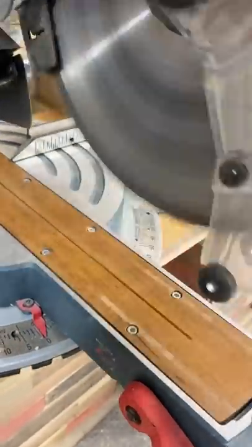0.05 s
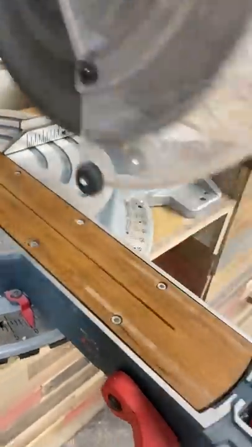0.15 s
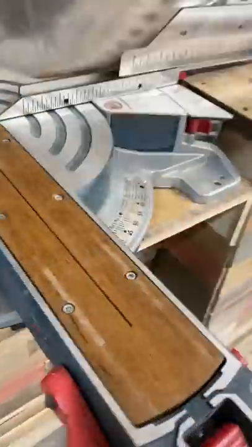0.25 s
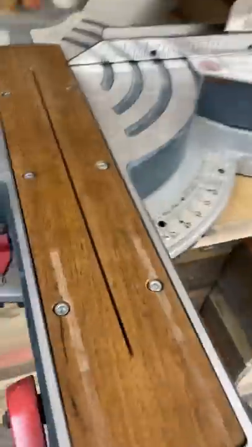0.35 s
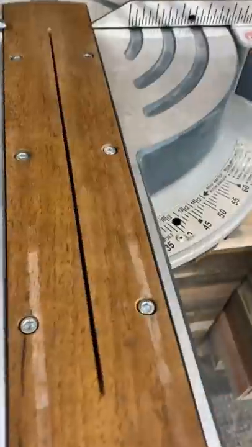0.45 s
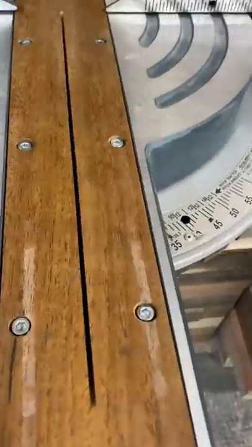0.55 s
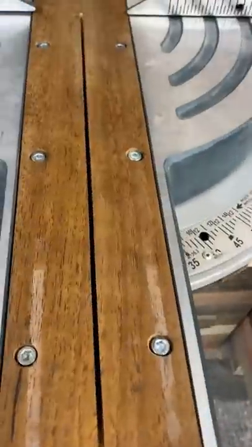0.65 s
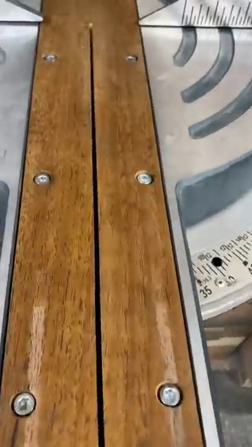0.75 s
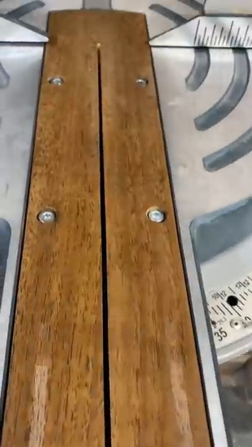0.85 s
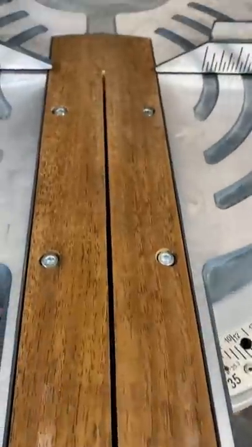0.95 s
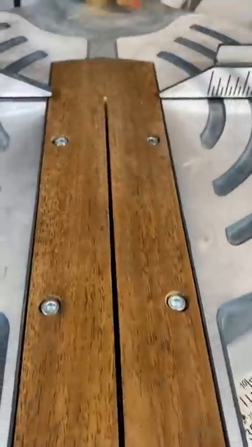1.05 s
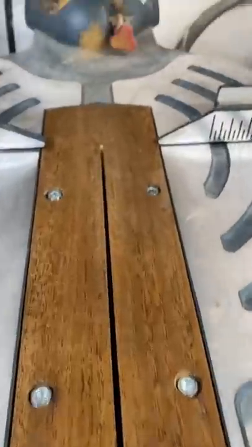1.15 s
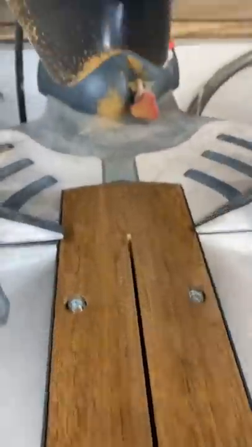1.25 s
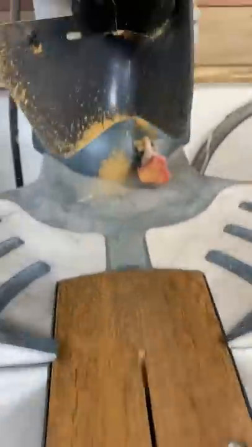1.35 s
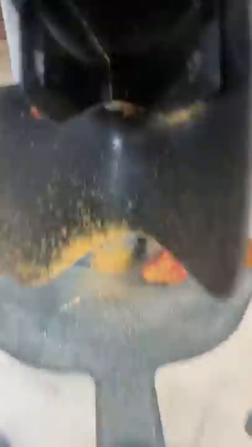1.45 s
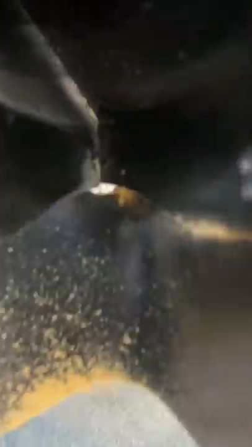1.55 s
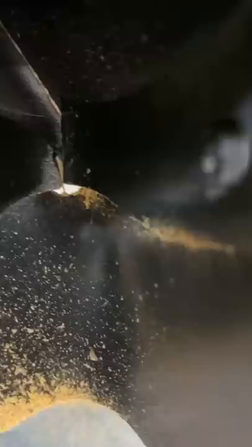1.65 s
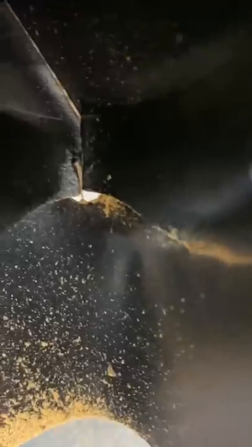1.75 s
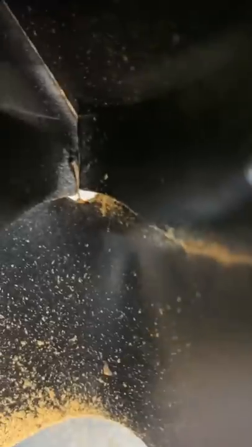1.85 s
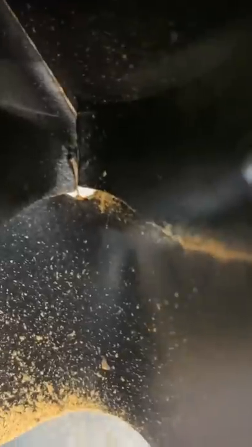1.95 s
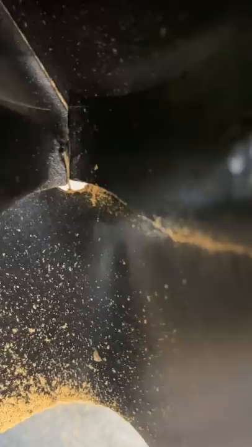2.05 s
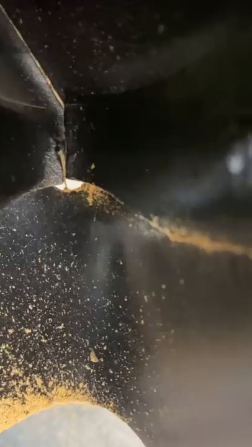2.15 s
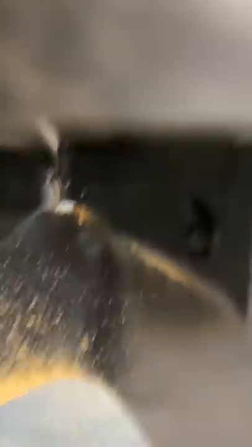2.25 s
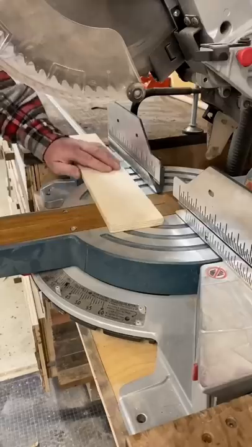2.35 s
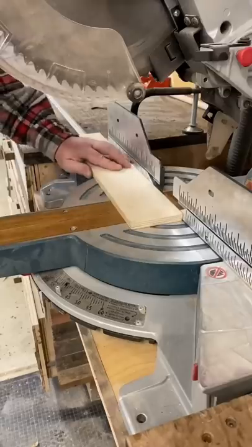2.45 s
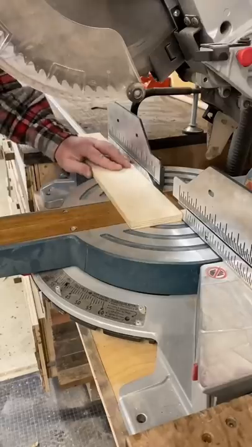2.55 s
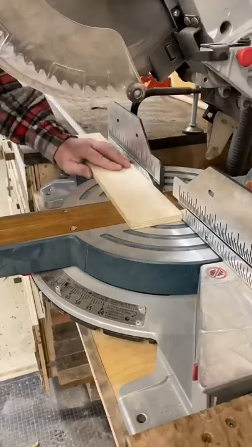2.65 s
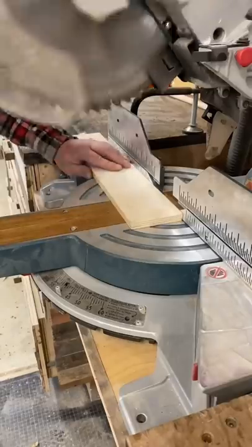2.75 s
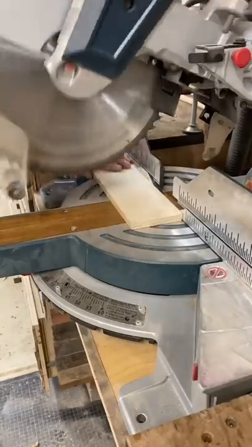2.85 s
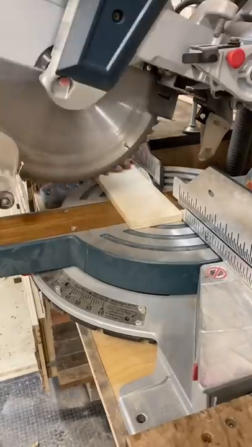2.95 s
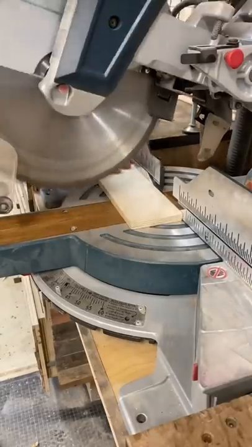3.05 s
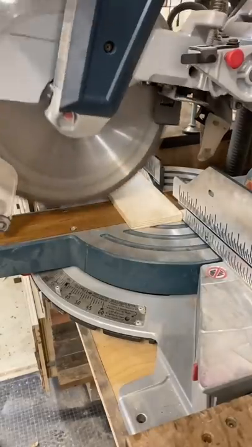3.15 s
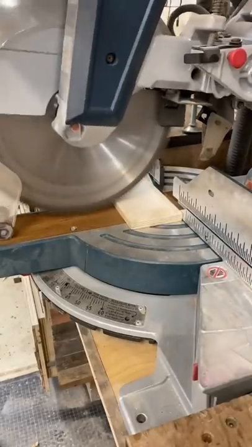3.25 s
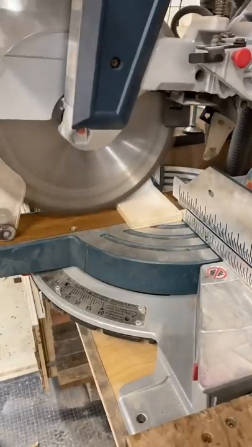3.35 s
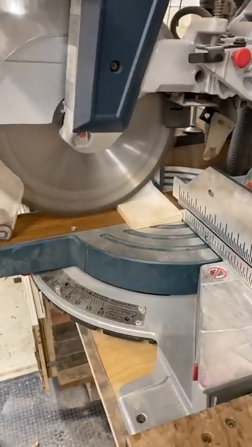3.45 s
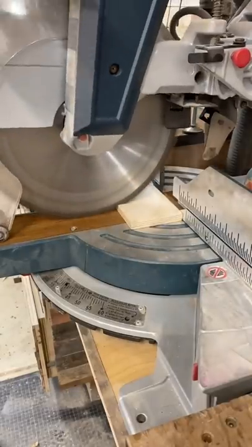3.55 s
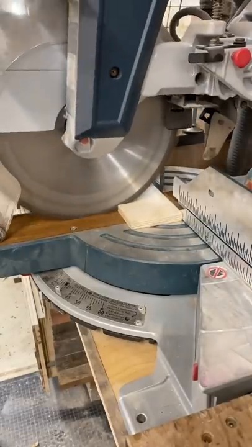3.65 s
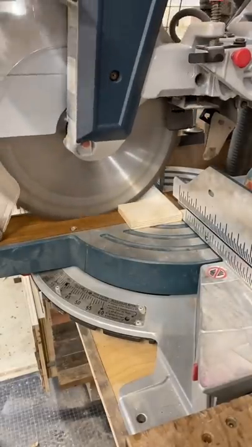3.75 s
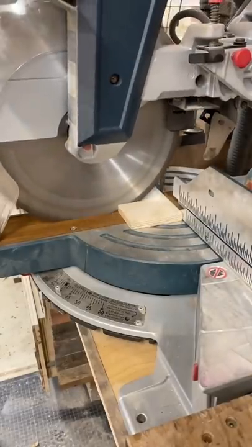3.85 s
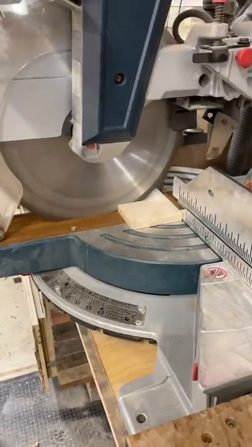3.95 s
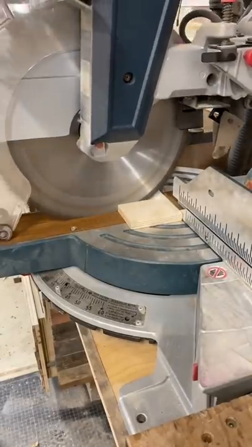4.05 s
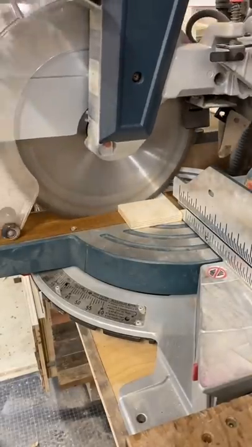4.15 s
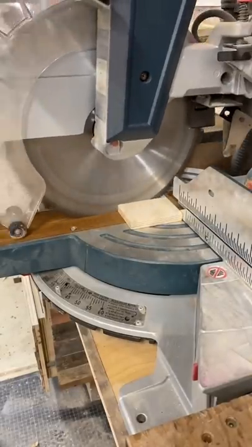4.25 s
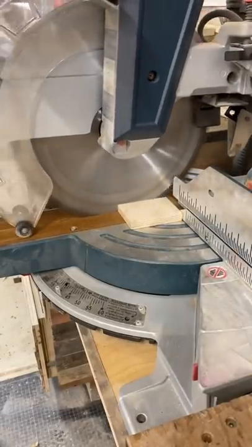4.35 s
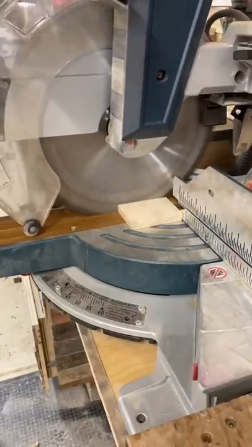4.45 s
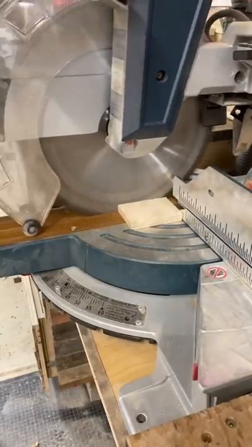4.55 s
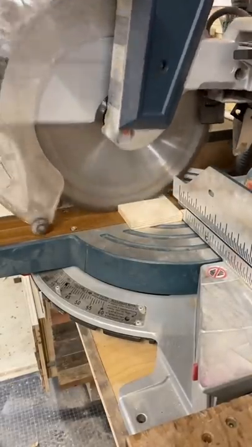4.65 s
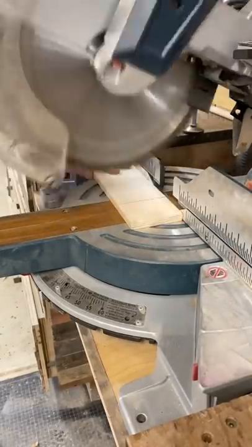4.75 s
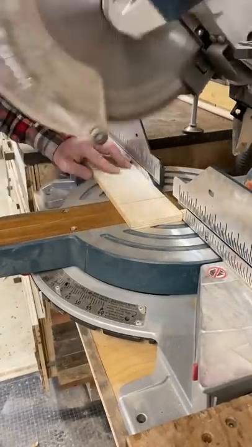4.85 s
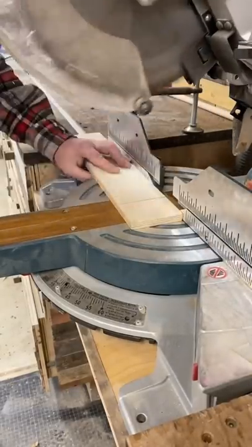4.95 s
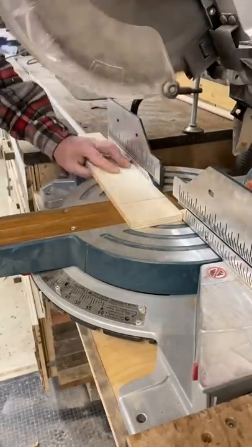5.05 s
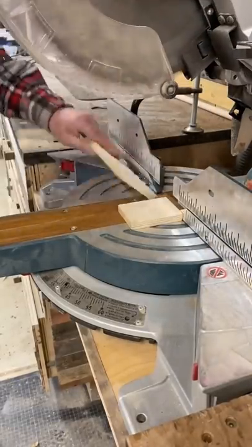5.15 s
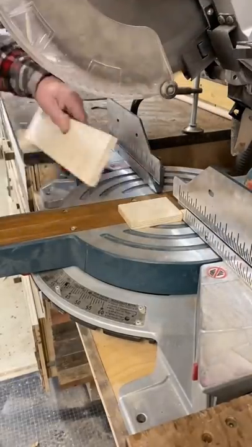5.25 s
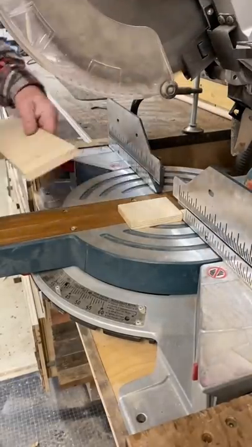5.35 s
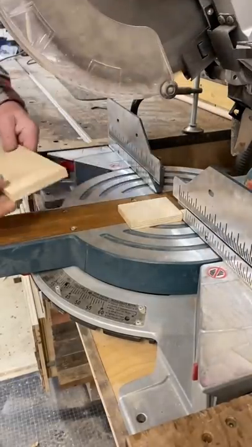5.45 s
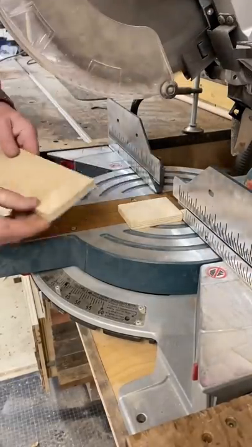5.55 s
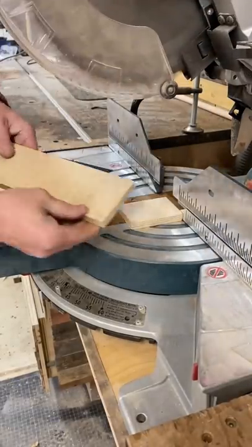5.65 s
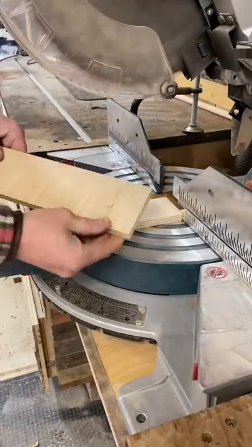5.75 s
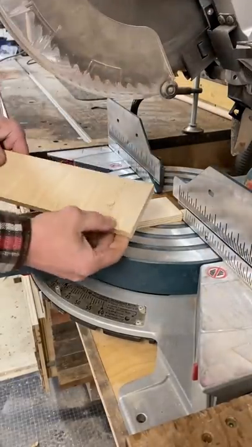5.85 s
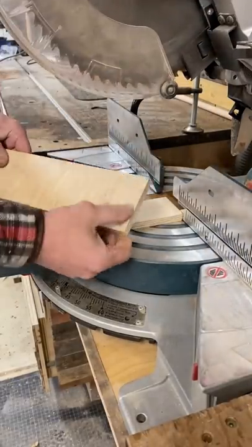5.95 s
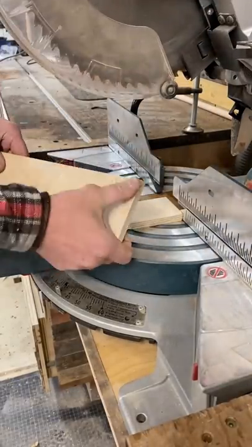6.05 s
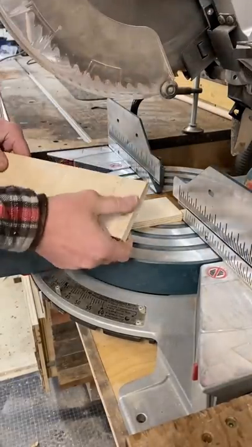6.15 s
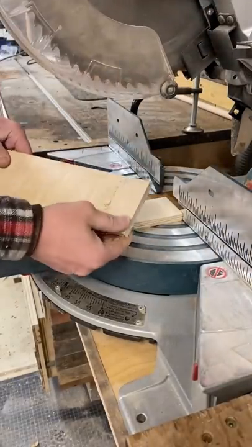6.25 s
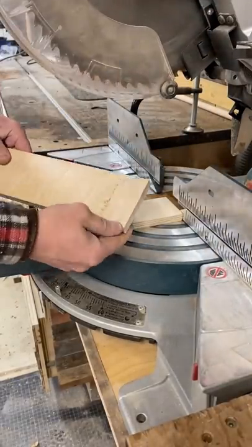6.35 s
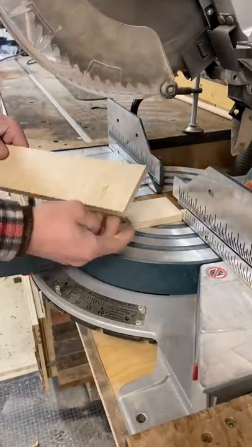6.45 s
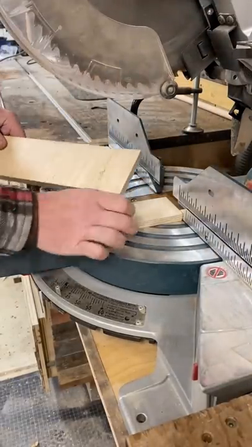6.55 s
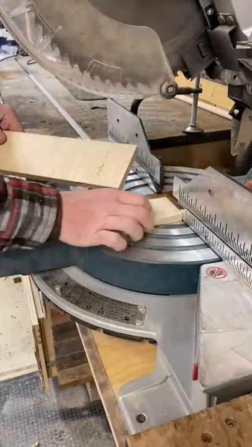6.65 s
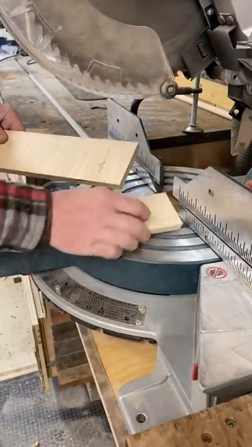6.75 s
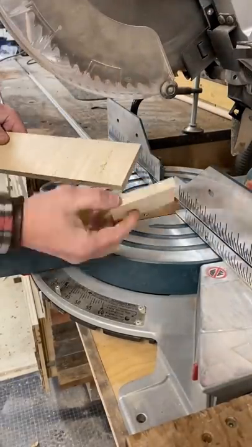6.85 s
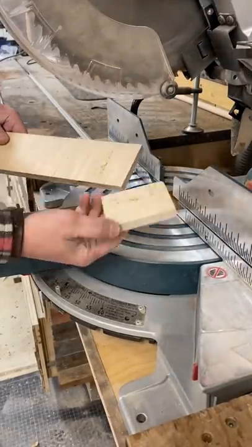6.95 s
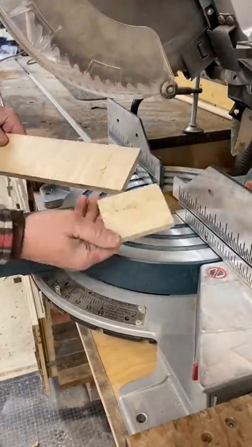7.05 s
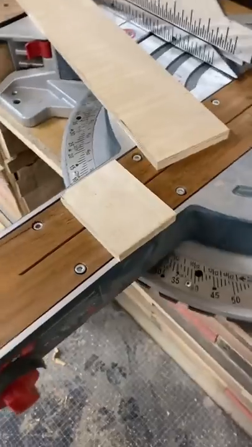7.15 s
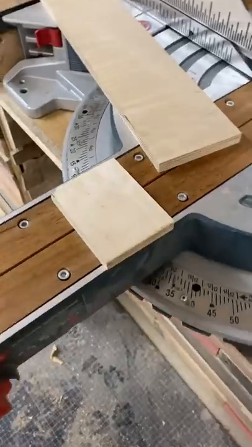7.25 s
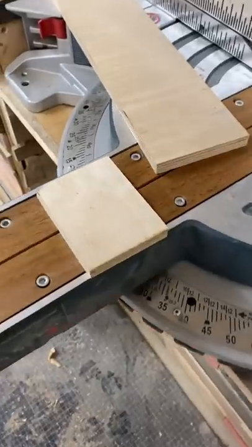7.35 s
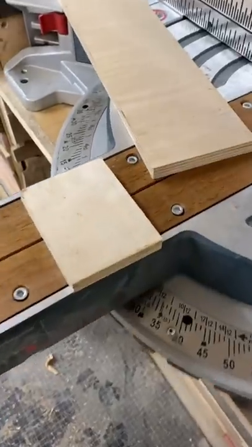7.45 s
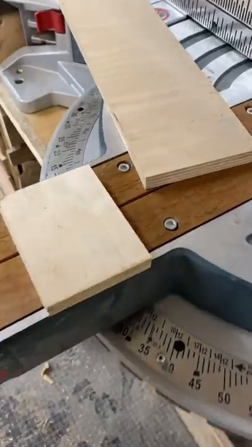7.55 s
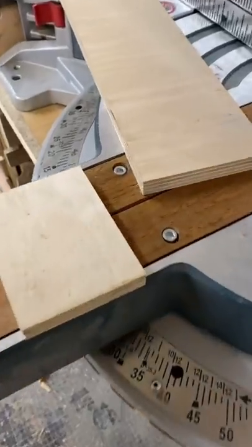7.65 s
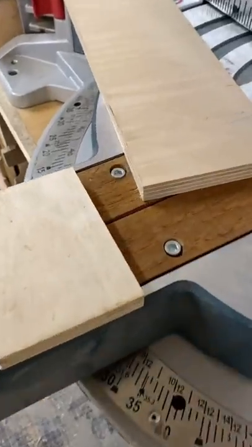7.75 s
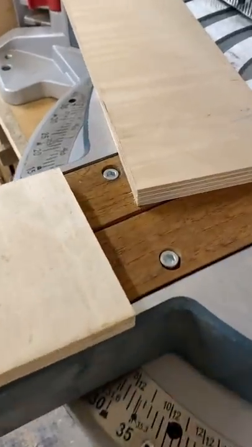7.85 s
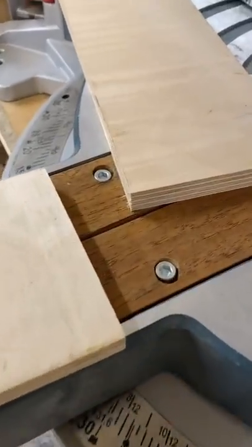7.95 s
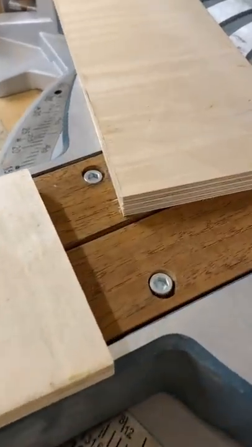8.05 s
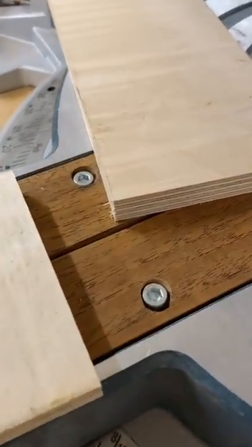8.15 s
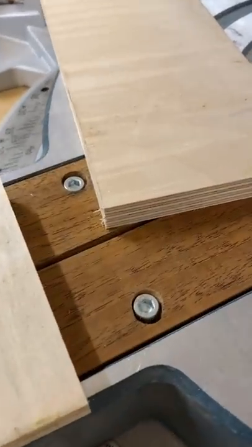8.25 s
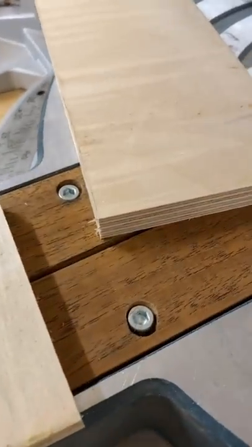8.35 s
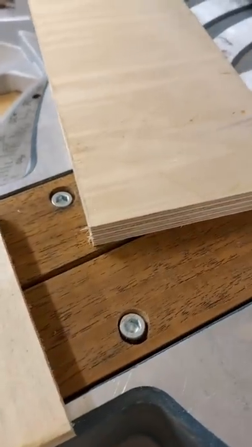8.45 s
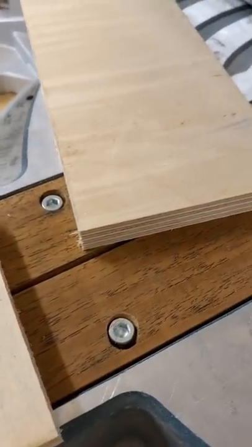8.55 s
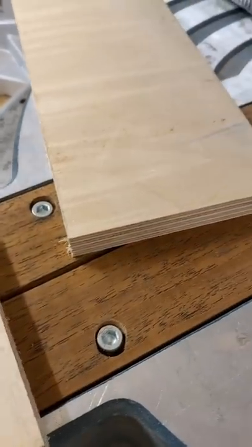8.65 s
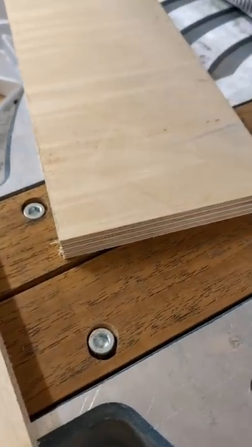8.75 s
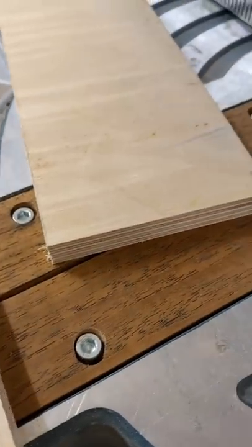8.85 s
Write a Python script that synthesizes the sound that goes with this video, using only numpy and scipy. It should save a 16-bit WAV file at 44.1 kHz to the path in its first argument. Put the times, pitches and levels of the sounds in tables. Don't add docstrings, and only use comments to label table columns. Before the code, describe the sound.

Close to a dust extractor, the last of a braking blade gives way to a tonal fan hum and airy hiss that glide down in pitch. Abruptly, beside a miter saw: a very loud latch snap, rattling knocks, a fierce motor run-up, bright ringing blade whoosh, a short rasp and falling brake whine over an extractor's roar. Then a sudden cut to a nearly silent workshop.

```python
import sys
import numpy as np
from scipy import signal
from scipy.fft import rfft, irfft, next_fast_len
from scipy.io import wavfile
from scipy.ndimage import uniform_filter1d

SR = 44100
rng = np.random.default_rng(int(sys.argv[2]) if len(sys.argv) > 2 else 0)


def store_pcm(level_fs):
    pcm = np.round(np.clip(level_fs, -1, 1) * 32767).astype(np.int16)
    wavfile.write(sys.argv[1], SR, np.atleast_2d(pcm).T)


def makeup_ratio(level_db):
    decades = np.asarray(level_db, float) / 20
    return 10 ** decades


N = 392931
T = np.arange(N) / SR
EDGE_HZ = 15880

# start t/s, end t/s
SHOTS = [
    (0, 2.223),
    (2.234, 6.979),
    (6.985, 9),
]


def evened(x):
    return x / np.sqrt(np.mean(x ** 2) + 1e-20)


def filtered(x, order, hz, kind):
    return signal.sosfilt(signal.butter(order, hz, kind, fs=SR, output="sos"), x)


def read(points, hz):
    f, value = np.transpose(points)
    return np.interp(np.log(hz + 1), np.log(f + 1), value)


def columns(rows):
    s, *values = np.transpose(rows)
    gate = uniform_filter1d(((T >= s[0]) & (T < s[-1])) * 1., size=90)
    return gate, [np.interp(T, s, v) for v in values]


def during(start, end):
    return np.append(np.arange(start, end, 1 / 200), end)


def drift(per_s, t=T):
    steps = rng.standard_normal(int(N / SR * 400) + 2)
    r = np.exp(-2 * np.pi * per_s / 400)
    wander = evened(signal.lfilter([1], [1, -r], steps))
    return np.interp(t * 400, np.arange(len(steps)), wander)


def strokes(rows, rise_db_per_s, fall_db_per_s, t=T):
    u = T[::40]
    gain = 0
    for s, hold, db in rows:
        before, after = np.maximum(s - u, 0), np.maximum(u - s - hold, 0)
        gain = gain + makeup_ratio(db - rise_db_per_s * before - fall_db_per_s * after)
    return np.interp(t, u, gain)


def lift_db(peaks, hz):
    return sum(db / (1 + (2 * (hz - f) / width) ** 2) for f, width, db in peaks)


# f/Hz, level/dB
LEAN = [
    [(300, 4.5), (1600, -4), (15000, 0)],
    [(300, 5), (1400, -2.5), (3100, -0.5), (5600, -4), (8000, -1.5), (9600, -9), (10400, 0.5), (15000, 0)],
    [(300, 2.5), (15000, -1)],
]
# f/Hz, phase/rad
LEAD = [
    [(0, 0), (1000, -.7), (2410, -1.5), (3960, -3.3), (7490, -6.4), (8960, -6), (11900, -3.3),
     (16500, -5.5)],
    [(0, 0), (500, -.2), (1290, -.4), (2200, -.1), (3800, 0), (5600, .95), (8300, .7), (9000, 1.6),
     (9650, 3.4), (10300, 5.9), (11000, 6.55), (12400, 7), (16500, 7.8)],
    [(0, 0), (300, .2), (1400, 2.9), (3400, 2), (8000, 2.3), (9990, 3.3), (11500, 6.9), (15000, 7.3)],
]


def ports(hz, shot):
    apart = np.clip(hz / 1100, 0, 1) ** 2
    lead = np.interp(hz, *np.transpose(LEAD[shot]))
    return makeup_ratio(apart * read(LEAN[shot], hz) / 2) * np.exp(.5j * apart * lead)


# f/Hz, likeness (0-1)
LIKENESS = [
    [(300, 1), (1500, 1), (15000, 0.051)],
    [(300, 1), (1400, .88), (2000, .8), (3200, 1), (4800, .82), (7500, .68), (9000, .65), (10300, .8),
     (11000, .95), (15000, .82)],
    [(150, 0.92), (600, 0.32), (15000, 0.7)],
]


def air(spectrum, shot, peaks=(), patchy_db=0.5, comb_db=3.0):
    hz = np.fft.rfftfreq(1024, 1 / SR)
    a, b, c, d, patches = rng.standard_normal((N // 256 + 5, 513, 5), dtype=np.float32).T
    patches = evened(uniform_filter1d(uniform_filter1d(patches, size=8, axis=0), size=10, axis=1))
    same = np.clip(np.where(hz < 350, 1, read(LIKENESS[shot], hz)), -1, 1)[:, None]
    lean = ports(hz, shot)[:, None]
    left = a + 1j * b
    right = same * left + np.sqrt(1 - same ** 2) * (c + 1j * d)
    z = np.array([left * lean, right / lean])
    x = signal.istft(z * makeup_ratio(patchy_db * patches), nperseg=1024, noverlap=768)[1]
    size = next_fast_len(N)
    fine = np.fft.rfftfreq(size, 1 / SR)
    comb = np.interp(fine, np.arange(900) * 25, rng.standard_normal(900))
    colour_db = read(spectrum, fine) + lift_db(peaks, fine) + comb_db * comb * np.clip(fine / 1200, .2, 1)
    return evened(irfft(rfft(x[:, :size], size) * makeup_ratio(colour_db), size)[:, :N])


def whine(rows, orders, body=(), waver_db=2.5, jitter=0.00084, ring=0.88):
    gate, (hz, level_db) = columns(rows)
    live = gate > 0
    hz, out = hz[live], np.zeros(N)
    turns = np.cumsum(hz * (1 + jitter * drift(25, T[live]))) / SR
    for k, db in orders:
        swell_db = level_db[live] + db + waver_db * drift(21, T[live]) + ring * lift_db(body, k * hz)
        audible = k * hz < EDGE_HZ
        out[live] += makeup_ratio(swell_db) * audible * np.sin(2 * np.pi * (k * turns + rng.random()))
    return gate * out * np.sqrt(2)


FAN_HZ, FAN_OFF_S, FAN_SLOWING, FAN_EASE = 1418, 1.376, 2.26, .9


def fan_db(t):
    return -20 / np.log(10) * FAN_SLOWING * np.maximum(t - FAN_OFF_S, 0) ** FAN_EASE


# t/s, level/dB
NEARNESS = [(0, -46.5), (.6, -41.5), (1.04, -40), (1.24, -38.5), (1.34, -36), (1.48, -31), (1.7, -33.5),
            (2.223, -43)]
# f/Hz, level/dB
ROAR_NEAR = [(65, -95), (110, -46), (326, -6.5), (481, -9.5), (828, -1.5), (895, -8.5), (1010, 3),
             (1340, -10.5), (1450, -3.5), (1720, -9), (2460, -1.5), (3300, -12.5), (4500, -14.5),
             (5850, -36), (9900, -120)]
HISS_NEAR = [(1470, -49), (2500, -20), (2970, 3.5), (3160, -6.5), (3950, -5.5), (7420, -6.5),
             (15200, -12.5), (16000, -14)]
SHOP_NEAR = [(110, -31.5), (170, -11), (250, 3.5), (400, 1.5), (1000, -4.5), (3000, -24), (4200, -2),
             (6000, -18), (15000, -26)]
# f/Hz, width/Hz, lift/dB
DUCT_NEAR = [(248, 6.8, 9), (504, 166, 13.5), (778, 21, -6), (2370, 30, -11), (3160, 28, -20),
             (3900, 50, -9)]
ROAR_LAW, HISS_LAW = 2.16, 3.55
HISS_GAIN = 1.92
HISS_DB, HISS_FLOOR_DB, SHOP_NEAR_DB = -51.5, -101, -58.5
COAST_DB, COAST_DB_PER_S = -45, 52
HISS_TOP_LAW, HISS_TOP_MIN_DB = 9, -25


def extractor_near():
    gate, (near_db,) = columns(NEARNESS)
    speed_db = fan_db(T)
    roar = makeup_ratio(near_db + ROAR_LAW * speed_db)
    hiss = makeup_ratio(HISS_DB + HISS_GAIN * (near_db + 42.5) + HISS_LAW * speed_db)
    hiss = hiss + makeup_ratio(HISS_FLOOR_DB) + makeup_ratio(COAST_DB - COAST_DB_PER_S * T)
    jet = air(HISS_NEAR, 0, patchy_db=3.5)
    top = makeup_ratio(np.maximum(HISS_TOP_LAW * speed_db, HISS_TOP_MIN_DB)) * filtered(jet, 4, 9500, "high")
    jet = filtered(jet, 4, 9500, "low") + top
    shop_air = makeup_ratio(SHOP_NEAR_DB) * air(SHOP_NEAR, 0, [(4200, 23, 10.5)])
    return gate * (roar * air(ROAR_NEAR, 0, DUCT_NEAR) + hiss * jet + shop_air)


# order, level/dB
FAN_ORDERS = [(2, 1), (3, -9), (4, -12)]
FAN_UPPER = [(4, -3), (5, -9), (6, -9), (7, -10), (8, -8), (9.5, -6), (11, -9), (12, -9), (14, -7),
             (17, -9)]
# order, level/dB
VANES = [(21.4, -10), (42.8, -5)]
# f/Hz, width/Hz, lift/dB
HOSE = [(1750, 600, 15), (2500, 500, 8), (4000, 700, 17), (7500, 4000, -14)]
VANE_BAND = [(4900, 2000, 21), (8000, 800, 4), (14000, 1500, 3), (11000, 4000, -8)]
# t/s, f/Hz, level/dB
FAN_FAR = [(3.35, 664, -44), (3.5, 685, -40.5), (4.4, 691, -44.5), (4.9, 708, -39), (6.985, 710, -38)]
FAN_TONE_DB, FAN_TONE_LAW = -62, 0.92


def fan_tones():
    t = during(*SHOTS[0])
    level_db = FAN_TONE_DB + FAN_TONE_LAW * fan_db(t) - 11 * np.exp(-t / 0.22)
    down = np.transpose([t, FAN_HZ * makeup_ratio(fan_db(t)), level_db])
    # f/Hz, width/Hz, lift/dB
    drum = [(506, 140, 40.5), (780, 170, 21.0), (990, 180, 12.0), (1410, 90, 7.0), (581, 89, -23),
            (233.0, 120, -34)]
    inlet = [(460, 150, 32), (1150, 380, 25), (1410, 90, 6), (233, 176, -31)]
    tones = whine(down, [(1, 0.0038)], inlet, waver_db=0.5)
    tones += whine(down, FAN_ORDERS, drum, waver_db=2.0)
    tones += whine(down, FAN_UPPER, HOSE, waver_db=-1.5)
    tones += whine(down, VANES, VANE_BAND, waver_db=5.5)
    return tones + whine(FAN_FAR, [(1, -1.5), (2, -28.0)], waver_db=1.0)


# start t/s, length/s, f/Hz, slowing per s, level/dB, fade/(dB/s)
BRAKES = [
    (0, .16, 1130, 6.6, -48, 90),
    (4.58, .5, 1030, 3.8, -41, 24),
]
# order, level/dB
BRAKE_ORDERS = [(6, -1), (6.5, -8), (9, -5), (10, -9), (12, -6), (13, -8), (16, -10), (18, -11)]


def brakes():
    # f/Hz, width/Hz, lift/dB
    housing = [(3100, 2200, 6), (2950, 350, 5), (4250, 350, 5), (5700, 1000, -8), (2200, 500, -16),
               (7500, 3500, -16), (1600, 400, 6)]
    out = np.zeros(N)
    for start, length, hz, slowing, db, fade_db in BRAKES:
        u = during(0, length)
        rows = np.transpose([start + u, hz * np.exp(-slowing * u), db - fade_db * u])
        out += whine(rows, BRAKE_ORDERS, housing if start else (), waver_db=2.5, jitter=.014)
    return out


# t/s, peak level/dB, f/Hz
THUMPS = [
    (2.154, -31, 480),
    (6.75, -46, 35.1),
    (6.96, -48, 34.4),
]


def thumps():
    out = np.zeros(N)
    for s, db, f in THUMPS:
        u = np.maximum(T - s, 0) * f
        out += makeup_ratio(db) * 2.2 * np.sin(2 * np.pi * u) * u * np.exp(-1.5 * u)
    return out


# t/s, peak level/dB, ring f/Hz, share of crack (0-1)
KNOCKS = [(2.155, -38.5, 540, 0.13), (2.265, -37.5, 698, 0.05), (2.281, -0.5, 3760, 0.5),
          (2.284, -2, 2330, .4), (2.287, -2.5, 710, 0.3), (2.551, -38, 845, .1), (2.555, -34.5, 845, 0),
          (2.569, -34.5, 1050, 0.5), (2.576, -36, 2500, .1), (2.61, -26.5, 1290, .2),
          (2.613, -16.5, 1072, 0.09), (2.623, -23, 1150, .05), (2.641, -21.5, 1019, .4),
          (2.647, -11.5, 892, 0.17), (2.651, -19.5, 1003, .3), (2.678, -26.5, 898, 0.2),
          (2.692, -14, 2934, 0.1), (2.698, -20, 2806, .2), (2.72, -30.5, 2900, 0.1),
          (2.752, -32, 1100, 0.15), (2.763, -30, 2800, .2), (2.776, -33, 1589, 0.3),
          (2.788, -28, 1310, 0.3), (2.82, -39.5, 1380, 0.9), (2.849, -15, 2920, .95),
          (2.855, -7, 1090, 0.1)]
# f/Hz, level/dB, t60/s
LATCH = [(710, -8, 0.091), (1050, -10, 0.044), (1310, 1, 0.041), (1840, -7.5, 0.03), (2330, 0.5, 0.024),
         (3683, -0.5, 0.033)]
# f/Hz, level/dB
CRACK = [(88, -43.5), (150, -24.5), (1870, -3.5), (2650, -8), (8230, -17.5), (9260, -23), (9820, -15),
         (14500, -22.5), (16000, -35.5)]
KNOCK_T60, KNOCK_RISE_S = 0.042, .0005
SNAP_T60 = .014
LATCH_LAW = .2
THUD_DB, THUD_LAW = -32, 0.66


def knocks():
    out, t = np.zeros(N), np.arange(SR // 4) / SR
    hz = np.fft.rfftfreq(len(t), 1 / SR)
    for s, db, ring_hz, share in KNOCKS:
        crack = evened(irfft(rfft(rng.standard_normal(len(t))) * makeup_ratio(read(CRACK, hz)), len(t)))
        body = filtered(crack, 2, 3500, "low")
        snap = 1.5 * (crack - body) * makeup_ratio(-60 * t / SNAP_T60)
        burst = body * makeup_ratio(-60 * t / (0.75 * KNOCK_T60)) + snap
        modes = sum(makeup_ratio(d - 60 * t / m) * np.sin(2 * np.pi * f * rng.uniform(.97, 1.03) * t)
                    for f, d, m in LATCH)
        modes = makeup_ratio(LATCH_LAW * db) * modes / abs(modes).max()
        ring_t60 = KNOCK_T60 * min(1.2, 1800 / ring_hz)
        ring = np.sin(2 * np.pi * ring_hz * t) * makeup_ratio(-60 * t / ring_t60)
        blow = share * burst + 0.28 * modes + 0.36 * ring
        thud = makeup_ratio(THUD_DB + THUD_LAW * db - 60 * t / .12) * np.sin(2 * np.pi * 260 * t)
        thud = thud * (1 - np.exp(-t / 0.0029))
        at = round(s * SR)
        out[at:at + len(t)] += makeup_ratio(db) * blow * (1 - np.exp(-t / KNOCK_RISE_S)) + thud
    return out


SAW_HZ, SAW_ON_S = 1052, 2.87
# t/s, hold/s, level/dB
ARM = [(2.275, 0.064, -34), (2.37, 0.041, -50), (2.45, 0.053, -60.5), (2.56, 0, -60), (2.63, 0.087, -38.5),
       (2.79, 0, -42), (2.85, 0.031, -43)]
# f/Hz, level/dB
SCRAPE = [(120, -34), (200, 4.5), (671, -11.5), (899, -5), (968, -8), (1590, -7.5), (1910, -21),
          (2960, -12), (3690, -19), (7680, -26.5), (16000, -37.5)]
# t/s, level/dB
STAND = [(2.234, -64), (2.27, -60), (2.56, -56.5), (2.7, -43), (2.8, -53), (3.22, -61), (5.14, -74),
         (6.98, -79)]
# f/Hz, level/dB
BUMP = [(20, -28.5), (55, -23), (78, -4), (110, -1), (200, -35.5), (400, -90.5)]


def arm():
    moving = (T > SHOTS[1][0]) & (T < SAW_ON_S)
    scrape = moving * strokes(ARM, 330, 450) * makeup_ratio(3.3 * drift(60)) * air(SCRAPE, 1, patchy_db=3.5)
    gate, (bass_db,) = columns(STAND)
    return scrape + gate * makeup_ratio(bass_db) * air(BUMP, 1)


# t/s, level/dB
AIR_FAR = [(2.85, -44), (3.04, -29), (3.32, -40), (4.66, -40), (6.83, -36), (6.979, -35)]
# f/Hz, level/dB
ROAR_FAR = [(26, -71), (45, -53), (150, -16), (201, -12), (238, 0), (320, -10), (510, -10.5), (636, -11),
            (702, -10), (774, -13.5), (1460, -12), (1870, -23.5), (3540, -18.5), (7950, -27.5),
            (9440, -31.5), (15800, -26)]
# f/Hz, width/Hz, lift/dB
DUCT_FAR = [(172, 27, 9), (283, 45, 6), (510, 99, 12), (1236, 50, 9.5), (1435, 67, 6.5), (2172, 160, 6.5),
            (3330, 65, -4), (6200, 42, 2), (6696, 64, 8.5), (7840, 73, 10)]


def extractor_far():
    gate, (roar_db,) = columns(AIR_FAR)
    return gate * makeup_ratio(roar_db + 1.5) * air(ROAR_FAR, 1, DUCT_FAR)


# t/s, level/dB
HUM = [(2.85, -30.5), (2.872, -21.5), (2.936, -28.5), (2.97, -18.5), (3.02, -16), (3.08, -24), (3.165, -25),
       (3.19, -36.5), (3.6, -45.5)]


def winding_hum():
    rows = [(s, 240, db) for s, db in HUM]
    return whine(rows, [(1, -5.0), (2, -21.0), (3, -20.0)], waver_db=3.5, jitter=0.0064)


# t/s, shaft order f/Hz
SPEED = [(2.87, 340), (2.94, 532), (2.98, 655), (3.02, 743), (3.06, 808), (3.12, 885), (3.22, 980),
         (3.4, 1025), (3.75, 1052)]


def blade_speed():
    brake_s, slowing = BRAKES[1][0], BRAKES[1][3]
    braking = np.exp(-slowing * np.maximum(T - brake_s, 0))
    return np.interp(T, *np.transpose(SPEED)) / SAW_HZ * braking


# t/s, surge level/dB
SURGES = [(2.905, 1.5), (2.962, 4), (3.015, 4), (3.053, 2), (3.096, 1.5), (3.165, 6), (3.225, 5.5),
          (3.282, 6.5)]
SURGE_S = 0.013


def surges():
    wobble_db = sum(db * np.exp(-.5 * ((T - s) / SURGE_S) ** 2) for s, db in SURGES)
    return makeup_ratio(wobble_db - 2.0 * np.clip((3.4 - T) / .1, 0, 1))


# t/s, level/dB
SAW = [(2.85, -23.5), (2.861, -27), (2.9, -17.5), (2.96, -16.5), (3.3, -25), (4.41, -31.5), (4.52, -31),
       (4.74, -37.5), (5.3, -45)]
# f/Hz, level/dB
WHOOSH = [(470, -40), (800, 3), (1150, 10), (1850, -5), (2600, -2), (3060, 1), (5110, 0), (5940, -4.5),
          (9450, -12), (10600, -15.5), (12600, -16.5), (16000, -18)]
# f/Hz, width/Hz, lift/dB
BLADE = [(3014, 30, 8), (3293, 27, 7), (3430, 21, 6), (5377, 22, 6), (6860, 30, 5), (7218, 39, 6),
         (9050, 40, 6), (9350, 900, -8), (10350, 96, 7), (10900, 200, 9), (12400, 40, 9), (13380, 60, 8),
         (13870, 60, 5)]
# t/s, level/dB
GROWL = [(3.2, -0.5), (3.5, -5), (4.0, -4), (4.45, -2.5)]
TOP_SLOW_DB, TOP_FULL_DB = -4, 8.5


def blade_whoosh():
    gate, (whoosh_db,) = columns(SAW)
    x = air(WHOOSH, 1, BLADE, patchy_db=2.5, comb_db=1.0)
    low, high = filtered(x, 4, 9000, "low"), filtered(x, 4, 9000, "high")
    frame = filtered(low, 1, [800, 1500], "band")
    low = low + (makeup_ratio(np.interp(T, *np.transpose(GROWL))) - 1) * frame
    top_db = TOP_SLOW_DB + (TOP_FULL_DB - TOP_SLOW_DB) * abs(blade_speed()) ** 5.8
    return surges() * gate * makeup_ratio(whoosh_db - 4.5) * (evened(low) + makeup_ratio(top_db) * evened(high))


# t/s, hold/s, level/dB
GEAR = [
    (2.87, .0, -54),
    (3.02, .3, -36),
    (3.5, .05, -40),
]
# order, level/dB
GEAR_ORDERS = [(3, -11), (6, 2), (12, 1)]
STARTING_ORDERS = [(1.5, -4), (2, -5), (3, -5), (4, 4), (4.4, -3), (5, -2), (5.4, -3), (6.4, 3), (7, -2),
                   (8, 4), (9, -3), (10, -3), (11.6, -1), (12, 3), (13, -2), (14, 1), (15, -3), (16, 0),
                   (18, -3), (20, -4), (24, -5)]
# f/Hz, width/Hz, lift/dB
CASE = [(2000, 900, -10), (3000, 220, 8), (3420, 300, 7), (3800, 250, -7), (4450, 200, 4), (5100, 300, 6),
        (6400, 300, 9), (7150, 700, -11), (7850, 400, 9), (9400, 600, -5), (10300, 500, 10),
        (11150, 250, 7), (12900, 500, 4)]


def motor():
    t = during(SAW_ON_S, BRAKES[1][0])
    level_db = 20 * np.log10(strokes(GEAR, 83, 31, t))
    spin = np.transpose([t, SAW_HZ * np.interp(t, T, blade_speed()), level_db])
    tones = whine(spin, GEAR_ORDERS, CASE, waver_db=4.5, jitter=.003, ring=.5)
    pulling = np.clip((3.27 - T) / 0.2, 0, 1)
    tones += pulling * whine(spin, STARTING_ORDERS, CASE, waver_db=5.5, jitter=0.009)
    return surges() * tones


# start t/s, end t/s, from f/Hz, to f/Hz, level/dB
DISC = [(2.89, 2.93, 2990, 3010, -27), (2.98, 3.05, 2960, 3000, -29), (3.15, 3.3, 12250, 12350, -36),
        (3.13, 3.18, 10600, 10850, -29), (3.55, 4.45, 3380, 3500, -45), (3.6, 4.45, 3090, 3130, -47),
        (3.9, 4.5, 4850, 4950, -46), (3.1, 3.32, 5560, 5720, -30), (3.3, 3.88, 5740, 5790, -36),
        (3.85, 4.2, 5790, 5780, -44), (3.07, 3.12, 10050, 10600, -23), (3, 3.03, 10150, 10350, -28),
        (3.15, 3.6, 2870, 3090, -43), (3.2, 3.34, 5390, 5375, -36), (3.5, 3.9, 5280, 5330, -44),
        (3.7, 4.5, 4400, 4620, -44), (4, 4.55, 1090, 1175, -44), (3.2, 3.9, 7200, 7240, -41),
        (3.3, 3.75, 8120, 8150, -40), (3.1, 4.4, 10900, 11000, -42), (3.2, 4.4, 13330, 13420, -46),
        (4.66, 5, 6880, 6240, -51), (4.7, 5.05, 7900, 7500, -53), (4.8, 5.25, 6930, 7120, -55),
        (4.8, 5.05, 5720, 5900, -53), (4.78, 5.15, 4500, 4490, -58)]


def disc_modes():
    out, u = np.zeros(N), np.linspace(0, 1, 12)
    for start, end, from_hz, to_hz, db in DISC:
        hz = from_hz + (to_hz - from_hz) * u ** .8
        rows = np.transpose([start + u * (end - start), hz, db - 14 * (2 * u - 1) ** 4])
        out += whine(rows, [(1, 0)], waver_db=3, jitter=.0015)
    return out


# t/s, hold/s, level/dB
RASP = [
    (4.5, 0.0067, -32.5),
    (4.6, 0.018, -72),
]
# order, level/dB
RASP_ORDERS = [(2, -11), (8, -14), (10, 0), (11, 1.5), (12, 0.5), (13, -3)]
RASP_TOP = [(17, 0.5), (19, -26), (21, 3), (24, -1)]


def kerf_rasp():
    kerf = [(4.35, 581, 0), (5.1, 581, 0)]  # t/s, f/Hz, level/dB
    rasp = strokes(RASP, 240, 96) * whine(kerf, RASP_ORDERS)
    return rasp + strokes(RASP[:1], 200, 160) * whine(kerf, RASP_TOP)


# t/s, hold/s, level/dB
RUSTLES = [
    (7, .9, -89),
    (7.02, .02, -74),
    (7.11, .01, -80),
    (7.19, .02, -78),
    (7.93, .11, -69),
]
# f/Hz, level/dB
RUMBLE = [(25, -41), (50, -22), (80, 0), (165, -1), (260, -14), (400, -20.5), (560, -22), (800, -32),
          (1100, -33.5), (1800, -33.5), (2400, -40.5), (4000, -47), (9000, -58), (15000, -57)]
RUSTLE = [(1470, -44), (2500, -17), (3160, -9), (5440, -5.5), (6700, 3), (7250, -1), (9960, -6),
          (13000, -7), (16000, -32)]
RUMBLE_DB, RUSTLE_FLOOR_DB = -58.5, -99
SHUFFLE_DB = 36.5


def quiet_shop():
    rumble = makeup_ratio(RUMBLE_DB + 1.2 * drift(12)) * air(RUMBLE, 2, patchy_db=2.5)
    shuffle = filtered(rumble, 2, 350, "high")
    rumble = makeup_ratio(0.5) * rumble + makeup_ratio(SHUFFLE_DB) * np.sqrt(strokes(RUSTLES, 150, 120)) * shuffle
    moving = makeup_ratio(RUSTLE_FLOOR_DB) + strokes(RUSTLES, 300, 450)
    rustle = moving * makeup_ratio(2 * drift(50)) * air(RUSTLE, 2, patchy_db=1.5)
    return (T >= SHOTS[2][0]) * (rumble + rustle)


# t/s, peak level/dB, f/Hz
TICKS = [(7.105, -72, 4500), (7.186, -70, 4800), (7.206, -66, 4760), (7.218, -62, 4600), (7.224, -64, 6800),
         (7.27, -72, 6800), (7.466, -69, 5120), (7.532, -69, 5100), (7.55, -72, 5200), (7.6, -74, 4600),
         (7.632, -69, 4700), (7.645, -72, 5500), (7.759, -67, 4930), (7.848, -68, 4880)]
TICK_T60 = .06


def ticks():
    out, t = np.zeros(N), np.arange(2000) / SR
    for s, db, hz in TICKS:
        puff = evened(filtered(rng.standard_normal(len(t)), 2, [.83 * hz, 1.2 * hz], "band"))
        shape = makeup_ratio(db - 7 - 60 * t / TICK_T60) * (1 - np.exp(-t / .002))
        out[round(s * SR):][:len(t)] += shape * puff
    return out


# t/s, f/Hz, level/dB
FAINT_HUM = [(7.95, 304, -78), (8.1, 300, -65.5), (8.26, 300, -61.5), (8.5, 297, -63.5),
             (8.6, 297.3, -75.5), (8.9, 298, -72)]


def faint_hum():
    return whine(FAINT_HUM, [(1, 0)], waver_db=2.5)


ROOM_T60, ROOM_DB = 0.44, -18.5


def room(x):
    taps = rng.choice([-1., 0, 1.], (2, SR // 2), p=[.025, .95, .025])
    taps *= makeup_ratio(-60 * np.arange(SR // 2) / SR / ROOM_T60) * (np.arange(SR // 2) > 150)
    taps = filtered(taps, 2, [900, 13000], "band")
    return signal.fftconvolve(x[None], taps / np.linalg.norm(taps[0]), axes=1)[:, :N]


def scene():
    tones = fan_tones() + brakes() + thumps() + knocks()
    tones += winding_hum() + motor() + disc_modes() + kerf_rasp()
    mix = extractor_near() + arm() + extractor_far() + blade_whoosh()
    mix = mix + quiet_shop() + ticks() + faint_hum()
    size = next_fast_len(N)
    hz = np.fft.rfftfreq(size, 1 / SR)
    for shot, (start, end) in enumerate(SHOTS[:2]):
        inside = (T >= start) & (T < end)
        step = ports(hz, shot)
        bass = np.minimum(hz / (150, 20)[shot], 1) ** 2
        direct = irfft(rfft(tones * inside, size) * bass * np.array([step, 1 / step]), size)[:, :N]
        mix = mix + inside * (direct + makeup_ratio(ROOM_DB) * room(tones * inside))
    return mix * ((T < SHOTS[0][1]) | (T >= SHOTS[1][0]))


def roll_off(x):
    return signal.sosfilt(signal.butter(12, 16900, fs=SR, output="sos"), x)


def record(dry):
    dry = filtered(dry, 2, 45, "high")
    edge = signal.firwin(511, EDGE_HZ, window=("kaiser", 9), fs=SR)
    limited = signal.oaconvolve(dry, edge[None], "same")
    mix = 0.92 * np.tanh(limited / 1.006)
    return roll_off(mix)


dry = scene()
out = record(dry)
store_pcm(out)
```